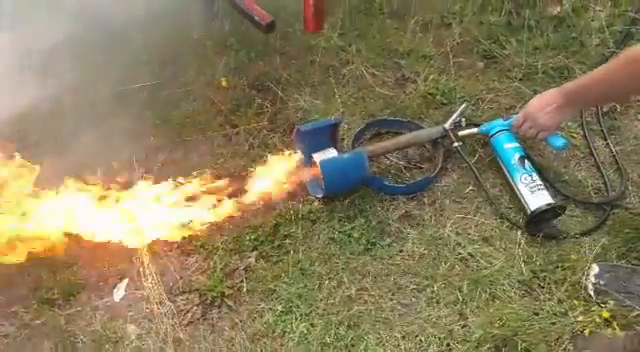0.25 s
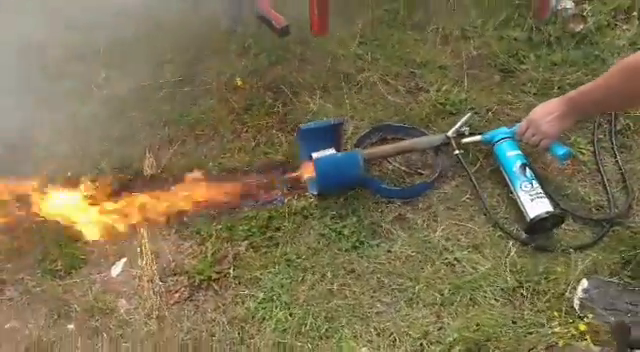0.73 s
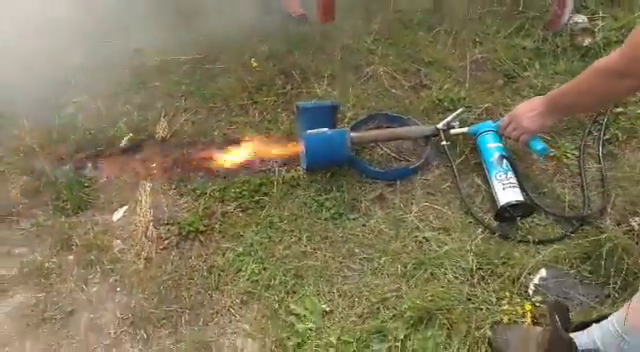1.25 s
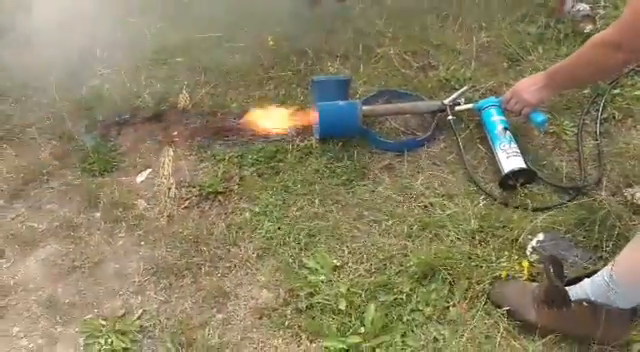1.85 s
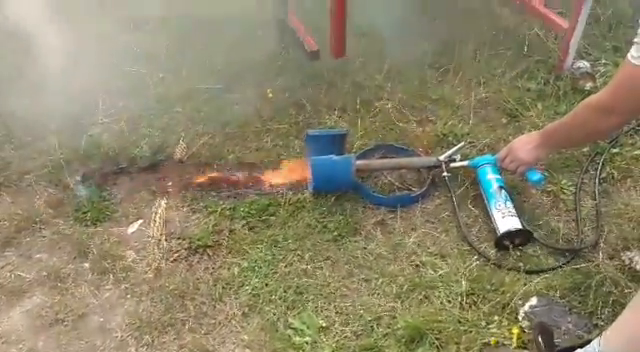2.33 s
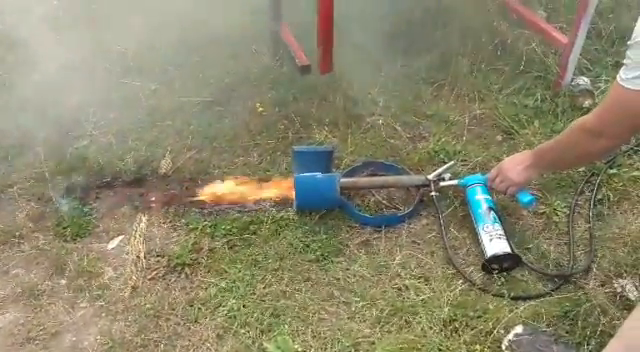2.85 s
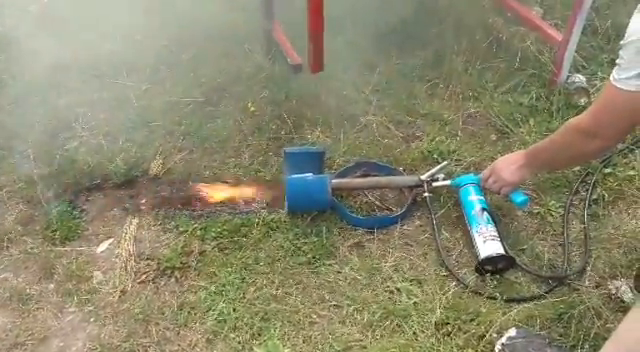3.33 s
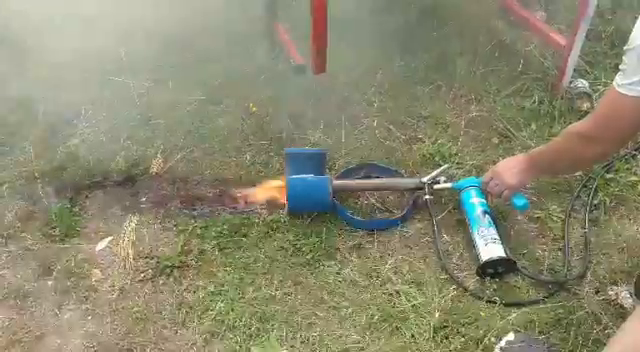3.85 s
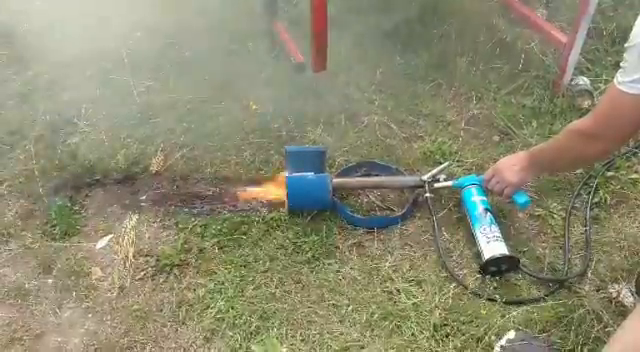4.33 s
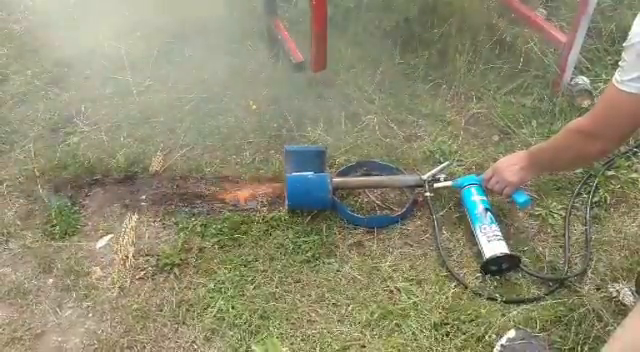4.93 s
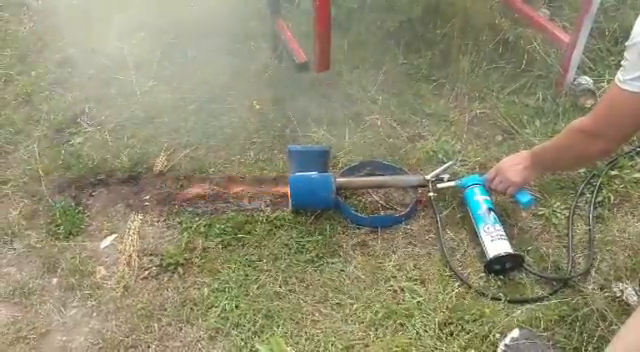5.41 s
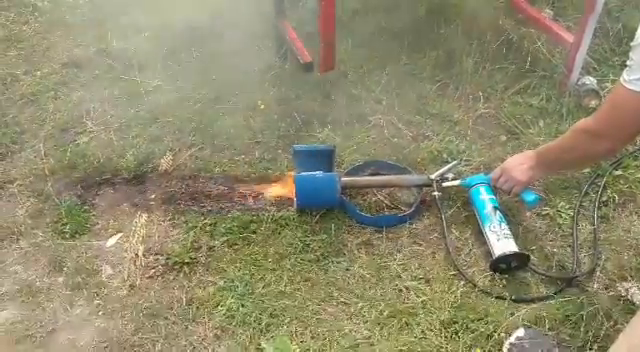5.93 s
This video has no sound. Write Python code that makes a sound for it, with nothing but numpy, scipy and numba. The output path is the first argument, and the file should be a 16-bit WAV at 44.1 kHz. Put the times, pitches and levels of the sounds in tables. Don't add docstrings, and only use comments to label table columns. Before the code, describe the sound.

A burst of igniting oil mist opens with a low, lumpy whoosh and strong air rush, then settles within a second into a loud continuous flame roar. The steel can adds a hollow, slightly wavering howl, and irregular hard pops crack through. Bright spray hiss and a rapid compressor clatter, about 47 strokes a second, throb underneath. Outdoors, very close stereo microphone, overloaded on the biggest pops, with a short dull wall echo.

```python
import sys
import numpy as np
from scipy import signal
from scipy.fft import rfft, irfft, next_fast_len
from scipy.io import wavfile
from scipy.ndimage import uniform_filter1d, minimum_filter1d
from numba import njit

SR = 44100
rng = np.random.default_rng(int(sys.argv[2]) if len(sys.argv) > 2 else 0)


def bounce(signal):
    frames = np.transpose(np.atleast_2d(signal))
    limited = np.clip(frames, -1, 1)
    pcm = np.round(limited * 32767).astype(np.int16)
    wavfile.write(sys.argv[1], SR, pcm)


def how_loud(loudness_db):
    steps = np.asarray(loudness_db, float) / 20
    return 10 ** steps


N = 272097
TIME_S = np.arange(N) / SR
STROKE_HZ = 47.425

# t/s, can howl level/dB, can pitch f/Hz, open flame level/dB
FLAME_COURSE = [(0.0, -24, 1050, 2.5), (0.12, -14, 966, 1.5), (0.45, -16, 972, -1), (0.85, -14, 973, -0.5),
                (0.97, -12, 914, 1.5), (1.45, -10.5, 903, -1.5), (1.9, -12, 920, 1), (2.1, -12.5, 910, 0),
                (2.28, -7.5, 910, 0.5), (2.6, -13, 935, 0), (3.15, -7.5, 899, 0.5), (3.5, -12.5, 935, -2.5),
                (3.9, -11, 917, 0), (4.3, -12.5, 923, -1.5), (5.05, -11, 931, -0.5),
                (5.5, -11.5, 926, -0.5), (5.95, -12, 947, -2.5), (6.17, -7.5, 905, -0.5)]
# t/s, air flow level/dB, oil spray at the nozzle level/dB
JET_COURSE = [(0.0, 6.5, 2.5), (0.1, 1.5, 2), (0.5, 1, 2), (0.7, 0.5, 0.5), (1.1, 2, 0.5), (1.45, 0, 1),
              (1.95, 1.5, 1.5), (2.45, -1.5, -0.5), (2.85, -0.5, -2.5), (3.15, 0.5, 0.5), (3.55, 0, -4),
              (4.0, 0.5, -2.5), (4.6, 1.5, -1), (5.05, 1, -2), (5.3, -0.5, -1.5), (5.95, -1, -4),
              (6.17, 0, -1)]
# t/s, peak level/dB
BIG_POCKETS = [(0.136, -1.5), (0.24, -7), (0.345, -2), (0.683, -7), (1.003, 1), (1.207, -4.5), (1.229, 2.5),
               (1.314, 1), (2.201, 4), (2.254, 0), (2.452, 3), (2.664, -12), (2.768, -8), (2.893, -8),
               (3.329, -4), (3.357, 2), (3.404, -4.5), (3.51, 6.5), (3.822, 0), (3.926, -8), (4.115, -1.5),
               (4.476, -3.5), (4.65, -2), (4.96, 2), (5.069, -2), (5.2, -0.5), (5.278, 0.5), (5.578, 0),
               (5.737, -2), (5.819, 4)]


def rms_one(x):
    return x / np.sqrt(np.mean(x ** 2) + 1e-20)


def in_time(rows):
    s, *columns = np.transpose(rows)
    return [np.interp(TIME_S, s, c) for c in columns]


def at_hz(points, hz):
    curve_hz, value = np.transpose(points)
    return np.interp(np.log(hz), np.log(curve_hz), value)


def drift(rate_hz):
    r = np.exp(-80 * np.pi * rate_hz / SR)
    noise = rng.standard_normal(N // 40 + 2002)
    slow = signal.lfilter([1], [1, -2 * r, r * r], noise)[2000:]
    return np.interp(np.arange(N) / 40, np.arange(len(slow)), rms_one(slow))


def late(x, lag_s):
    size = next_fast_len(N + 4096)
    hz = np.arange(size // 2 + 1) * SR / size
    return irfft(rfft(x, size) * np.exp(-2j * np.pi * hz * lag_s), size)[..., :N]


def band_pass(x, low_hz, high_hz):
    return signal.sosfilt(signal.butter(2, [low_hz, high_hz], "band", fs=SR, output="sos"), x)


@njit
def resonate(x, hz, width_hz):
    y, r = np.zeros_like(x), np.exp(-np.pi * width_hz / SR)
    for i in range(2, x.shape[1]):
        pull = 2 * r * np.cos(2 * np.pi * hz[i] / SR)
        for c in range(x.shape[0]):
            drive = (1 - r * r) / 2 * (x[c, i] - x[c, i - 2])
            y[c, i] = drive + pull * y[c, i - 1] - r * r * y[c, i - 2]
    return y


def throb(lead):
    return np.cos(2 * np.pi * (STROKE_HZ * TIME_S + lead))


def turbulence(spectrum, swell_db, patchy_db, lag_s, count):
    # f/Hz, share of power
    scattered_share = [(100, 0.0083), (1000, 0.024), (1700, 0.5), (2500, 0.19), (4000, 1), (8000, 0.82),
                       (16000, 0.7)]
    edges = np.geomspace(spectrum[0][0], min(spectrum[-1][0], .45 * SR), count + 1)
    white = rng.standard_normal((2, 3, N))
    direct, scattered = 0, 0
    for k, (low, high) in enumerate(zip(edges, edges[1:])):
        hz = np.sqrt(low * high)
        level_db = at_hz(spectrum, hz) + swell_db + patchy_db * drift(9.8)
        band = band_pass(white[k % 2], low, high) * how_loud(level_db)
        share = np.clip(at_hz(scattered_share, hz), 0, 1)
        direct = direct + np.sqrt(1 - share) * band[0]
        scattered = scattered + np.sqrt(share) * band[1:]
    return rms_one(np.stack([late(direct, lag_s), direct]) + scattered)


def flame(flutter_db):
    # f/Hz, density/dB per Hz
    rumble = [(22, -8), (45, -8.5), (70, -16), (100, -5), (160, 1), (300, -1), (420, -12.5), (600, -6),
              (800, -4)]
    # f/Hz, density/dB per Hz
    rasp = [(1100, -39), (1400, -3), (1800, 1.5), (2100, -5.5), (2400, -14)]
    howl_db, can_hz, open_db = in_time(FLAME_COURSE)
    can_hz = can_hz * (1 + .02 * flutter_db)
    lag_s, can_width_hz, can_skirt_hz = 6.5e-5, 103, 602
    blast, crack, lull_db = pops(lag_s)

    burning_db = 3.16 * throb(0.77) + 1.52 * flutter_db + lull_db
    burning = turbulence([(350, 0), (1900, 0)], burning_db, patchy_db=0.16, lag_s=lag_s, count=1)
    howl = resonate(resonate(burning, can_hz, can_skirt_hz), can_hz, can_width_hz)
    pipe_hz = 1.104 * can_hz
    howl = howl + how_loud(-15.5) * resonate(resonate(burning, pipe_hz, can_skirt_hz), pipe_hz, 52)
    out = how_loud(howl_db - 6.5) * rms_one(howl)

    puff = resonate(blast, can_hz, 240.0) * SR / (2 * np.pi * can_width_hz)
    out += how_loud(-3.5) * resonate(puff, can_hz, can_width_hz)
    out += how_loud(5.0) * band_pass(crack, 1300, 2300)

    rumble_swell_db = 2.4 * throb(0.71) + 1.53 * flutter_db
    out += how_loud(-23.5 + 1.45 * open_db) * turbulence(
        rumble, rumble_swell_db, patchy_db=-1.1, lag_s=lag_s, count=11)
    rasp_swell_db = 2.8 * throb(0.64) + 1.4 * flutter_db
    out += how_loud(-32.5 + open_db) * turbulence(rasp, rasp_swell_db, patchy_db=2.0, lag_s=lag_s, count=4)
    return out


def pops(lag_s):
    s, peak_db, fresh = pockets()
    at, luck = (s * SR).astype(int), rng.standard_normal(N)
    blast, crack, starve = np.zeros((3, N))
    blast[at] = how_loud(peak_db)
    crack[at] = how_loud(peak_db - 20 - luck[at])
    big_starve = 1.74
    starve[at[:fresh]] = 1
    starve[at[:len(BIG_POCKETS)]] = big_starve
    lull = np.convolve(starve, np.hanning(int(0.013 * SR)))[int(.010 * SR):][:N]
    blast, crack = [np.stack([late(c, lag_s), c]) for c in (blast, crack)]
    return blast, crack, -9.0 * np.minimum(lull, big_starve)


def pockets():
    big_s, big_db = np.transpose(BIG_POCKETS)
    strokes = np.arange(1, int(N / SR * STROKE_HZ) - 1)
    luck, (scatter, size) = rng.random(len(strokes)), rng.standard_normal((2, len(strokes)))
    small_s = (strokes + 0.27 + 0.16 * scatter) / STROKE_HZ
    free = np.abs(small_s[:, None] - big_s).min(axis=1) > .75 / STROKE_HZ
    lit = (luck < .3) & free
    small_db = -3.5 + 2.5 * size
    flame_s, can_hz = np.transpose(FLAME_COURSE)[[0, 2]]
    follow_s = big_s + 6 / np.interp(big_s, flame_s, can_hz)
    s = np.concatenate([big_s, small_s[lit], follow_s]) - .0012
    peak_db = np.concatenate([big_db + 3, small_db[lit], big_db + 3 - 5])
    return s, peak_db, len(s) - len(big_s)


def overtones(flutter_db):
    # multiple of can pitch, width/Hz, level/dB, dB per dB of the spray's swing
    modes = [(2.25, 304, -44.5, 1.9), (3.56, 196, -41.5, 2.2)]
    can_hz, spray_db = in_time(FLAME_COURSE)[1], in_time(JET_COURSE)[1]
    swell_db = 5.8 * throb(0.87) + 1.9 * flutter_db
    out = 0
    for multiple, width_hz, level_db, follows in modes:
        air = turbulence([(1500, 0), (5000, 0)], swell_db, patchy_db=2.0, lag_s=6e-5, count=1)
        ring = resonate(resonate(air, multiple * can_hz, 2 * width_hz), multiple * can_hz, width_hz)
        out = out + how_loud(level_db + follows * spray_db) * rms_one(ring)
    return out


def jet(flutter_db):
    # f/Hz, density/dB per Hz
    low_rush = [(2200, -2), (2550, -7), (2950, -3)]
    rush = [(2900, -2), (3150, 7.5), (3400, 6.5), (3650, 2.5), (3900, 3)]
    sharp = [(3600, -2.5), (4000, 0), (4500, 0), (4900, -7), (5400, -20)]
    hiss = [(5000, 1.5), (6200, -5), (7500, -10), (9000, -11), (11000, -15.5), (12000, -22.5), (12600, -22),
            (13500, -23.5), (15200, -26), (16800, -23)]
    # f/Hz, width/Hz, level/dB
    whistles = [(7480, 60, -67), (10915, 40, -68), (11290, 50, -72), (13065, 40, -78)]
    flow_db, spray_db = in_time(JET_COURSE)
    lag_s = 6e-5
    fill_db = 0.24 * (TIME_S - N / 2 / SR)
    low_swell_db = 0.77 * throb(0.36) + 0.6 * flutter_db
    out = how_loud(-40.5 + 0.98 * flow_db + fill_db) * turbulence(
        low_rush, low_swell_db, patchy_db=2.5, lag_s=lag_s, count=3)
    rush_swell_db = 1.67 * throb(0.82) + 1.14 * flutter_db
    out += how_loud(-38.5 + spray_db) * turbulence(rush, rush_swell_db, patchy_db=-0.7, lag_s=lag_s, count=5)
    sharp_swell_db = 2.6 * throb(0.62) + .5 * flutter_db
    out += how_loud(-39 + flow_db) * turbulence(sharp, sharp_swell_db, patchy_db=1.66, lag_s=lag_s, count=5)
    hiss_swell_db = 2.1 * throb(0.83) + 0.19 * flutter_db
    out += how_loud(-42 + flow_db) * turbulence(hiss, hiss_swell_db, patchy_db=1.34, lag_s=lag_s, count=12)
    for hz, width_hz, level_db in whistles:
        centre = np.full(N, float(hz))
        tone = resonate(resonate(rng.standard_normal((2, N)), centre, width_hz), centre, width_hz)
        out += how_loud(level_db) * rms_one(tone)
    return out


def whoosh(flutter_db):
    roll = turbulence([(55, 0), (130, 0)], flutter_db, patchy_db=3.0, lag_s=6.5e-5, count=2)
    return how_loud(-29.5 - 8 * TIME_S) * roll


def compressor():
    # t/s, level/dB
    knocks = [
        (.0018, 0.5),
    ]
    # multiple of stroke rate, level/dB
    thump = [(2, -39.5), (3, -43.5), (4, -34.5), (6, -44.5)]
    # f/Hz, level/dB, decay by 60 dB/s
    valve_modes = [(1470, -46, .2), (2181, -53, .15), (2324, -54, .15), (2419, -53, .15), (2466, -50, .15),
                   (2514, -50, .15), (2609, -52, .15), (2751, -50, .15), (2798, -50, .15), (2893, -51, .15),
                   (2988, -52, .15), (3415, -47, .15), (3509, -51, .15), (3746, -52, .15)]
    strokes = np.arange(int(N / SR * STROKE_HZ)) / STROKE_HZ
    clicks = np.full(N, 1e-18)
    for s, knock_db in knocks:
        uneven_db = 1.4 * rng.standard_normal(len(strokes))
        clicks[np.round((strokes + s) * SR).astype(int)] += how_loud(knock_db + uneven_db)
    out = np.zeros(N)
    for k, level_db in thump:
        out += how_loud(level_db) * np.sin(2 * np.pi * k * STROKE_HZ * TIME_S + k * k)
    for hz, level_db, t60 in valve_modes:
        r, w = how_loud(-60 / (t60 * SR)), 2 * np.pi * hz / SR
        out += how_loud(level_db) * signal.lfilter([0, np.sin(w)], [1, -2 * r * np.cos(w), r * r], clicks)
    return np.stack([out, late(out, 1.7e-4)])


def scene():
    # t/s, level/dB
    echoes = [
        (0.0134, -12.5),
        (0.0154, -24),
    ]
    flutter_db = drift(67.5) + 0.084 * drift(11.0)
    near = flame(flutter_db) + overtones(flutter_db) + jet(flutter_db)
    near = near + whoosh(flutter_db) + compressor()
    dull = signal.lfilter([.3], [1, -.7], near)
    return near + sum(how_loud(level_db) * late(dull, s) for s, level_db in echoes)


def limiter(x):
    # t/s, excess share
    overshoots = [
        (.347, .2),
        (1.317, .45),
        (3.406, .4),
        (4.117, .15),
        (5.071, .65),
        (5.833, .6),
    ]
    s, excess = np.transpose(overshoots)
    through = np.zeros((2, N))
    through[:, (s * SR).astype(int)] = [np.ones(len(s)), 1 + excess]
    gate, height = [np.convolve(row, np.hanning(350), "same") for row in through]
    gain = minimum_filter1d(np.minimum(1, 1.03 / (np.abs(x).max(axis=0) + 1e-9)), size=131)
    held = x * uniform_filter1d(gain, size=131)
    crest = uniform_filter1d(-minimum_filter1d(-np.abs(held), size=101), size=51)
    blast = held * (1 - gate + height / crest)
    knee = 6
    rounded = blast / (1 + np.abs(blast) ** knee) ** (1 / knee)
    return np.clip((1 - gate) * blast + gate * rounded, -.995, .995)


def thin_out(x):
    # f/Hz, level/dB
    grit = [(900, -32), (1400, -44), (2600, -12), (5000, -11), (8000, 0.5), (13000, 2)]
    # f/Hz, level/dB
    weakest = [(1000, -78), (1400, -67), (2000, -70), (2600, -66), (4000, -72), (5200, -73), (7550, -75.5),
               (7900, -72), (8300, -76), (11000, -76), (12000, -82.5), (13000, -79), (14200, -86),
               (15500, -81)]
    hz, s, each = signal.stft(x, SR, nperseg=2048, noverlap=1536)
    noise = signal.stft(rng.standard_normal(x.shape), SR, nperseg=2048, noverlap=1536)[2]
    local_power = uniform_filter1d(np.abs(each) ** 2, size=15, axis=1)
    local = np.sqrt(local_power / np.mean(np.abs(noise) ** 2))
    each = each + how_loud(at_hz(grit, hz + 1))[:, None] * local * noise
    frames = np.stack([each[0] + each[1], each[0] - each[1]]) / 2

    rows, columns = np.arange(len(hz)) // 12, np.arange(frames.shape[2]) // 4
    band_db = 10 * np.log10(uniform_filter1d(np.abs(frames) ** 2, size=12, axis=1) + 1e-20)
    middle_row = np.minimum(12 * rows + 6, len(hz) - 1)
    middle_column = np.minimum(4 * columns + 2, len(columns) - 1)
    block_db = uniform_filter1d(band_db, size=4, axis=2)[:, middle_row][:, :, middle_column]

    per_frame = rng.standard_normal(columns[-1] + 1)
    per_block = rng.standard_normal((2, rows[-1] + 1, columns[-1] + 1))
    gap = (hz[:, None] > 2300) & (hz[:, None] < 2900)
    thrift_db = 2.8 * gap * np.sign(2.7 - s)
    thrift_db = thrift_db + 3.5 * (hz[:, None] > 11400) * per_frame[columns]
    thrift_db = thrift_db + 3.0 * per_block[:, rows][:, :, columns]
    kept = block_db > at_hz(weakest, hz + 1)[:, None] + thrift_db
    mid, side = signal.istft(frames * kept, SR, nperseg=2048, noverlap=1536)[1][:, :N]
    return np.stack([mid + side, mid - side])


def low_pass(x):
    return signal.sosfilt(signal.butter(12, 16160, fs=SR, output="sos"), x)


def record(dry):
    low_cut = signal.butter(2, 46, "high", fs=SR, output="sos")
    ports = signal.sosfilt(low_cut, dry) * how_loud([[.8], [-.8]])
    blur = [.2, .6, .2]
    cross = signal.lfilter(np.convolve(blur, blur), [1], late(ports[::-1], 15 / SR))
    wide = ports - how_loud(-1.0) * cross
    tilted = signal.sosfilt(signal.butter(1, (1730, 5600), "band", fs=SR, output="sos"), wide)
    wide = limiter(wide + 0.077 * tilted * [[-1], [1]])
    top_cut = signal.cheby2(16, 45, 15700, fs=SR, output="sos")
    return low_pass(signal.sosfilt(top_cut, thin_out(wide)))


dry = scene()
out = record(dry)
bounce(out)
```